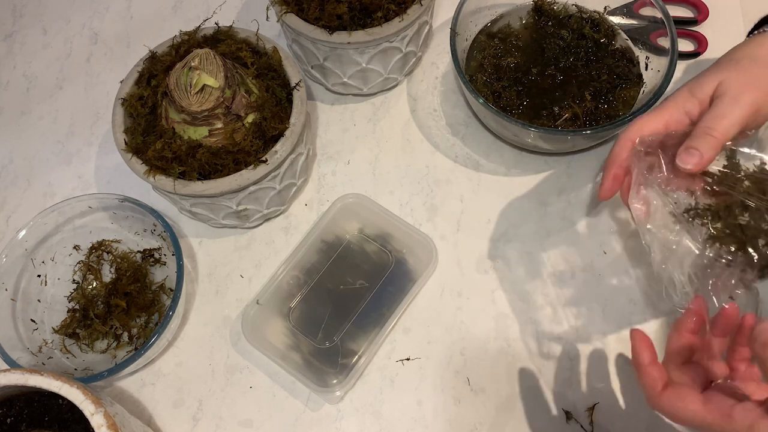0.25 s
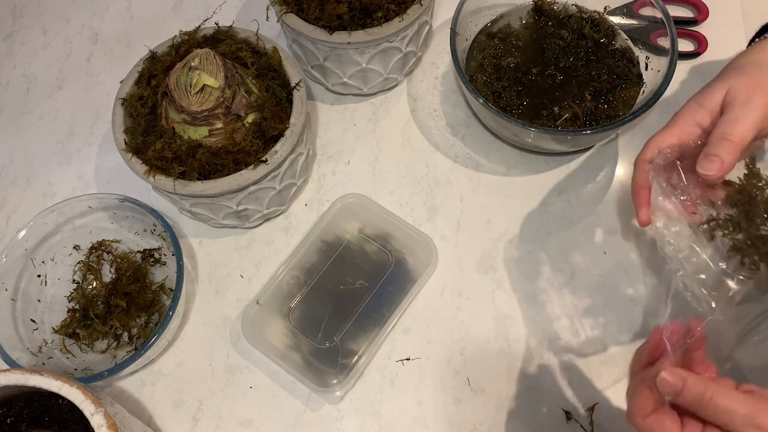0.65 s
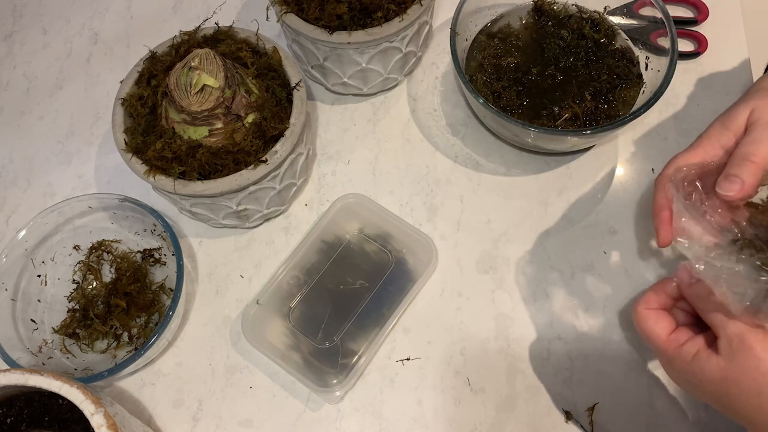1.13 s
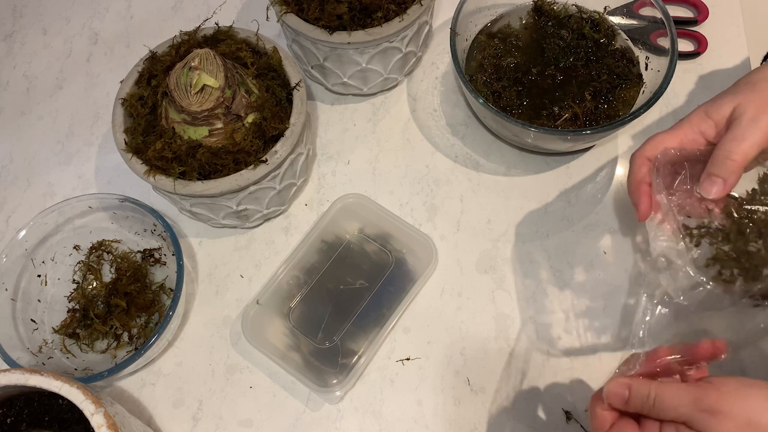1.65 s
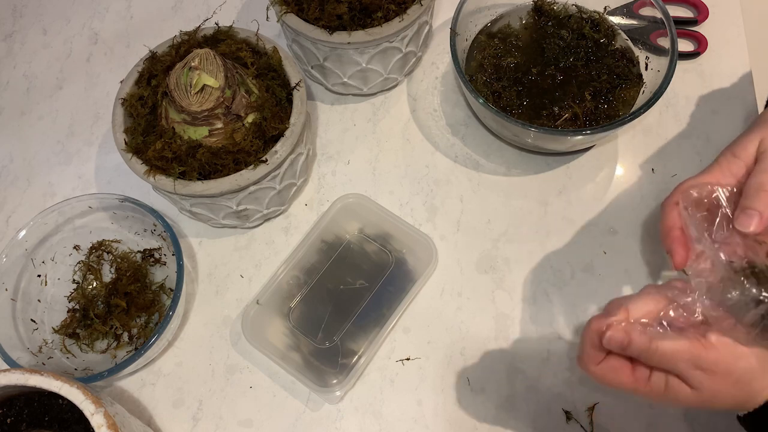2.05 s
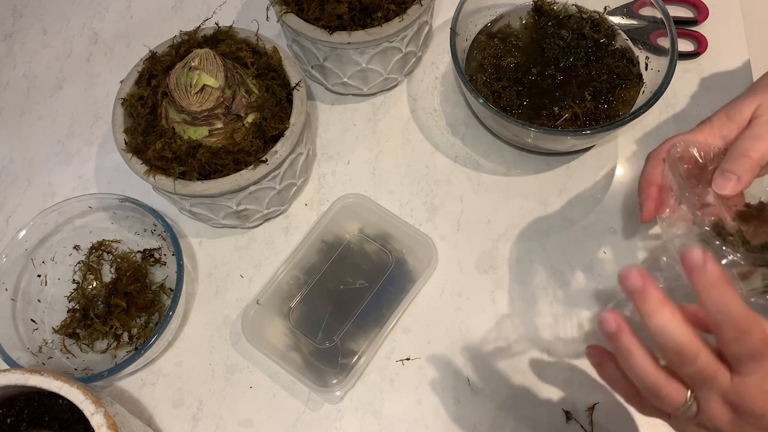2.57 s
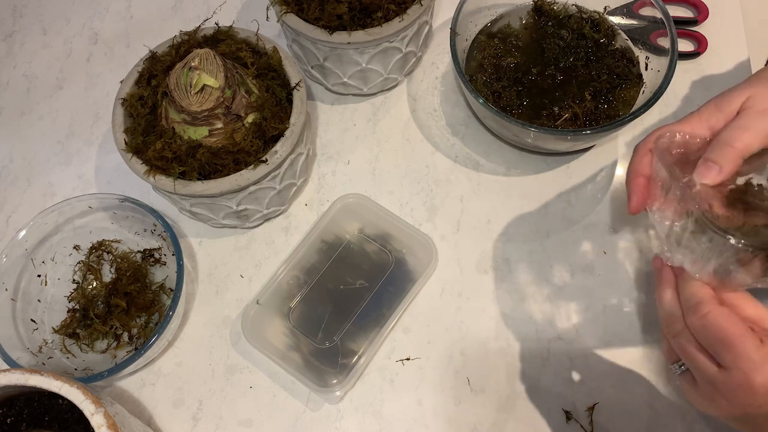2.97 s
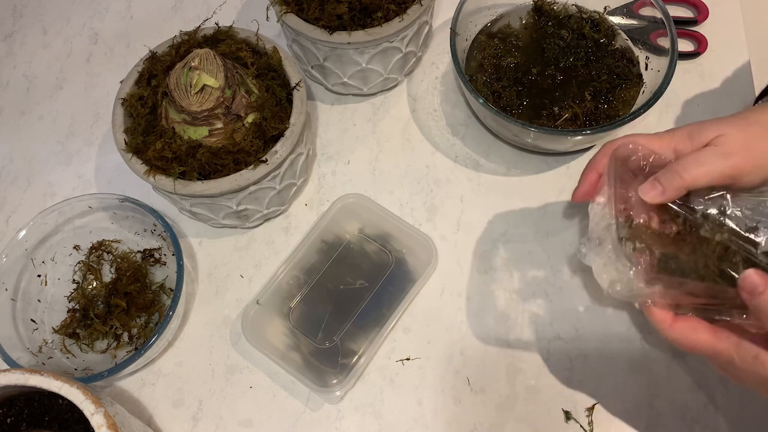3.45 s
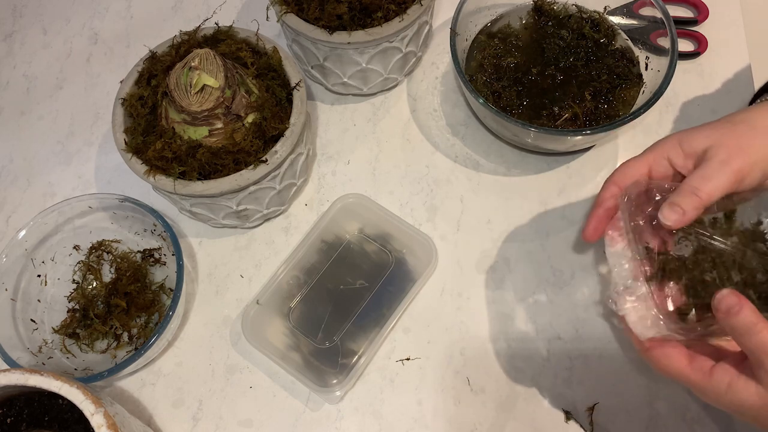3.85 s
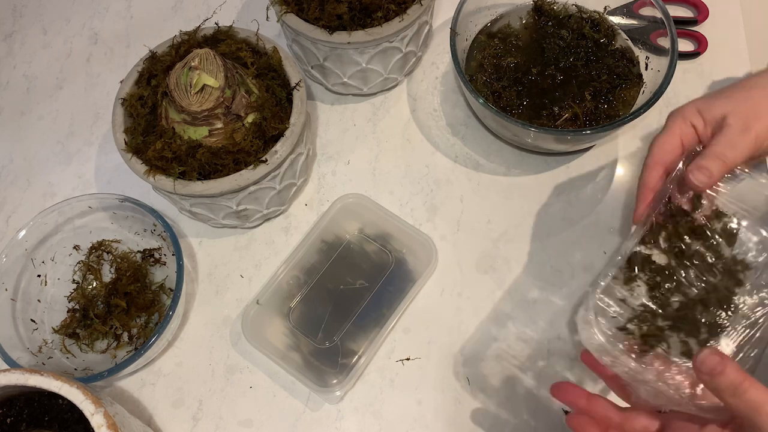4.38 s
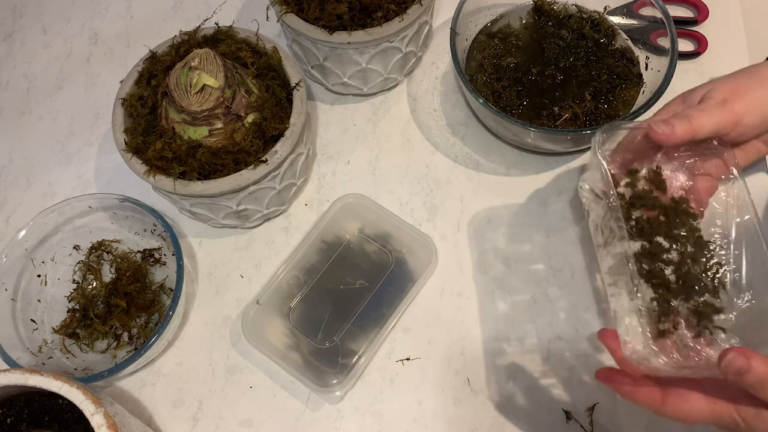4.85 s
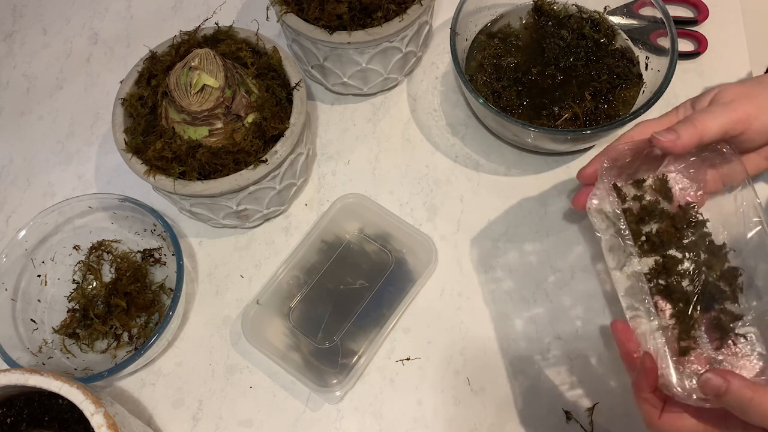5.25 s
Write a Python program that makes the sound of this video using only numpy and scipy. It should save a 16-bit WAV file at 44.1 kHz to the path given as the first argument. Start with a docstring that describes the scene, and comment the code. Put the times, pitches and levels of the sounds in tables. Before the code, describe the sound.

Cling film is pulled tight around a thin plastic tub, heard close in a small, hard-walled kitchen. A single sharp, pitched snap comes right at the start as the tub wall buckles. From about 0.4 to 1.7 seconds, short pulls make the film crinkle in swarms of tiny bright clicks, with a few separate ticks and a soft hollow bump. Around 2 seconds a quick cluster of snaps follows, then more rustling and light fingertip bumps until about 3.4 seconds. A loud crack at 3.5 seconds opens the busiest part: strong snaps of differing pitch crowd in around 4.3 seconds, at 4.8, and from 5.2 to 5.4, while the duller rubbing of fingers on film grows. Each snap has a short, bright echo, with nearby bowls ringing very faintly. A quiet, low room hum with slight hiss lies underneath throughout.

```python
"""Hands pull cling film tight round a thin plastic tub on a kitchen worktop.
First comes one sharp, pitched snap as the tub wall buckles; then short pulls make the film rustle
in swarms of tiny crease clicks. Near 2 s come a few more snaps, then more rustle and fingertip bumps.
From about 3.5 s the loudest snaps crowd in and the rubbing grows. All along, a near wall throws
each snap back, and the small hard room and its bowls ring on over a low murmur."""
import sys
import numpy as np
from scipy import signal
from scipy.fft import rfft, irfft, next_fast_len
from scipy.io import wavfile

SR = 44100
rng = np.random.default_rng(int(sys.argv[2]) if len(sys.argv) > 2 else 0)


def put_to_file(sound):
    """Save the sound as 16-bit audio at rate SR, in the file named by the first command-line argument."""
    columns = np.atleast_2d(sound).T  # one column per channel
    safe = np.clip(columns, -1, 1)
    whole_steps = np.round(safe * 32767)
    wavfile.write(sys.argv[1], SR, whole_steps.astype(np.int16))


N = 243431

# Levels in the tables are relative. A "tone" is a pitch at which the plastic rings.
# The tub wall buckles under the tight film, a different patch each time:
# time_s, crack_db, treble_edge_hz, main_tone_db, main_tone_hz, second_tone_hz, third_tone_hz
WALL_SNAPS = [(0.1105, -9, 15000, 2.5, 1380, 5500, 2750), (1.8946, -2.5, 4800, 11.5, 648, 1440, 500),
              (2.088, -3, 6100, 3, 930, 2280, 4320), (2.1388, 2.5, 2100, 16, 764, 1700, 2900),
              (2.15, -3.5, 2460, 11.5, 1290, 650, 290), (3.4869, 9.5, 6900, 22.5, 3330, 2060, 730),
              (3.9217, -3, 9500, 7.5, 1700, 1160, 3440), (4.2418, 5, 3500, 11.5, 2530, 1450, 322),
              (4.254, 5, 2600, 16.5, 730, 1480, 313), (4.3446, 9.5, 7400, 17, 725, 3960, 2100),
              (4.3804, 0, 16000, 16.5, 1420, 1170, 8100), (4.5731, -2, 4100, 10, 1350, 2420, 680),
              (4.847, 9.5, 8140, 28, 1123, 3240, 530), (5.17, 6, 8100, 17.5, 2620, 503, 1740),
              (5.2148, 3, 16000, 13.5, 5300, 3800, 396), (5.3525, -4.5, 9200, 5, 1010, 2270, 5100),
              (5.379, 6, 14400, 14, 850, 5570, 3570)]
LEAD_S = .003  # room ahead of each crack, so that its start is not cut off
# A single fold of film flips with a bright tick: time_s, crack_db, pitch_hz
FOLD_TICKS = [(0.072, -18.5, 1020), (0.6235, -22.5, 4150), (0.7404, -22, 780), (0.8644, -19.5, 6030),
              (0.9943, -8, 4400), (1.014, -14, 1970), (1.353, -11, 885), (1.457, -17, 2410),
              (2.3084, -19, 1420), (2.354, -24, 10940), (2.641, -31.5, 2520), (2.8638, -9, 8700),
              (3.1606, -23.5, 1110), (3.723, -12, 2720), (3.749, -12, 1080), (3.863, -13.5, 2550),
              (4.312, -14.5, 740)]
# A fingertip bumps the tub, ringing its hollow and its wall: time_s, hollow_db, wall_db
FINGER_BUMPS = [(0.625, -2.5, -18), (2.959, -5, -7.5), (3.2275, -21, 1.5), (3.724, -11, 0),
                (3.432, -18, -15), (4.227, -11, -11)]
# A hand pulls or smooths the film: start_s, length_s, crinkle_db, rub_db
FILM_PULLS = [(0.39, 0.047, -55.5, -61), (0.432, 0.06, -51, -67), (0.554, 0.04, -56.5, -60),
              (0.715, 0.12, -61, -58), (0.831, 0.089, -48.5, -56.5), (0.945, 0.12, -46.5, -48.5),
              (1.329, 0.06, -47.5, -47.5), (1.409, 0.047, -46, -51), (1.502, 0.1, -54, -56.5),
              (1.647, 0.055, -53, -55.5), (2.033, 0.042, -57, -55), (2.285, 0.15, -60.5, -56.5),
              (2.631, 0.02, -50.5, -54.5), (2.676, 0.11, -54.5, -66), (2.801, 0.09, -46.5, -62),
              (2.91, 0.04, -55, -61), (3.153, 0.03, -57, -55.5), (3.32, 0.03, -56.5, -61),
              (4.258, 0.11, -55, -48), (4.643, 0.031, -58, -51), (5.136, 0.37, -60, -50.5)]
# Between pulls the film stirs in the grip, more once the tub is turned over: time_s, crinkle_db, rub_db
GRIP_STIR = [(0, -63, -61.5), (0.4, -62, -63.5), (0.69, -68, -68), (1.18, -62, -64), (1.28, -68, -68),
             (2.35, -58.5, -59), (2.6, -79, -87), (3.049, -63.5, -64.5), (3.8, -60, -49),
             (4.199, -60, -55.5), (5.1, -60.5, -51.5), (5.5, -63, -51)]
# The bright crinkle of small creases: frequency_hz, gain_db
CRINKLE_COLOUR = [(600, -38), (1800, -12), (3500, -4), (6000, 0.5), (9000, 1.5), (13000, 5), (16000, -1)]
# The duller rub of fingers and broad folds: frequency_hz, gain_db
RUB_COLOUR = [(100, 3.5), (280, 2), (500, 1.5), (900, -2), (1500, 2), (2800, -4.5), (5000, -3),
              (12000, -44)]
# First echoes from nearby surfaces: delay_s, gain_db
EARLY_ECHOES = [(.0056, -4), (0.0134, -7), (0.0235, -8)]
# How long the room takes to fade by 60 dB: frequency_hz, fade_s
ROOM_FADE = [(200, 0.24), (600, 0.44), (1150, 0.48), (2300, 0.4762), (3400, 0.44), (5000, 0.4337),
             (9000, 0.2963), (15000, 0.3859)]
# How strongly the room rings, from bass to treble: frequency_hz, gain_db
ROOM_TONE = [(150, 4), (310, 7), (410, 4), (600, 3.5), (1200, 1), (2400, 1), (3500, 1.5), (7000, 3.5),
             (11000, 0.5), (16000, -8)]
# How wide the room sounds (more side signal is wider): frequency_hz, side_gain_db
STEREO_WIDTH = [(100, -20.5), (350, -16), (700, -8.5), (1400, -6), (4400, -9), (8500, -6.5), (15000, -15)]
# Bowls and pots on the worktop ring along faintly: pitch_hz, level_db, fade_s
BOWL_TONES = [(309.3, 5, 0.69), (787, 7, 0.091), (994, 13.5, 0.58), (1110, 5, 1), (1320, -13, 0.57),
              (1477, 9.5, 0.18), (1930, -22, 0.54), (3240, 9, 0.45)]
# The room's steady murmur and hiss: frequency_hz, gain_db
MURMUR_COLOUR = [(15, -19), (35, -20), (60, -5.5), (130, -3.5), (190, -3.5), (300, 0.5), (450, -6),
                 (700, -8.5), (1500, -12), (4000, -17), (9000, -21.5), (16000, -34)]


def snap(patch, lags, ring_db, crack_s=0.000758, q=3.38, low_hz=540, air_hz=15000):
    """A patch of plastic flips over: a very short crack and a few cycles of its own tones."""
    crack_db, edge_hz, *tones = patch
    f = np.fft.rfftfreq(4096, 1 / SR) + 1
    bass_cut = 1 - 1 / (1 + (f / low_hz) ** 4)  # a small patch gives off little bass
    power = amp(crack_db - 1) ** 2 / (1 + (f / edge_hz) ** 5) * bass_cut
    for hz, db in tones:
        ratio = (f / hz) ** 2
        power += (amp(db + ring_db) * ratio / (ratio + (q * (1 - ratio)) ** 2)) ** 2
    power = power / (1 + (f / air_hz) ** 12) + 1e-6
    # bending waves travel at different speeds, so each band arrives at its own moment
    delay_s = LEAD_S + crack_s * np.interp(f, np.linspace(0, SR / 2, len(lags)), lags)
    smear = np.exp(-2j * np.pi * np.cumsum(delay_s) * (f[1] - f[0]))
    sound = irfft(ring_out(power) * smear)[:len(f)]
    return sound * signal.windows.tukey(len(f), .08)


def patches(hollow_hz=330, wall_hz=730):
    """Lists snaps, ticks and bumps as time_s, crack_db, treble_edge_hz, then (pitch_hz, level_db) tones."""
    walls = [(s, db, edge_hz, (main_hz, main_db), (second_hz, db + 7), (third_hz, db + 3.5))
             for s, db, edge_hz, main_db, main_hz, second_hz, third_hz in WALL_SNAPS]
    folds = [(s, db, 10000, (hz, db + 8.5), (hollow_hz, db + 1)) for s, db, hz in FOLD_TICKS]
    bumps = [(s, -26, 2100, (hollow_hz, hollow_db), (wall_hz, wall_db))
             for s, hollow_db, wall_db in FINGER_BUMPS]
    return walls + folds + bumps


def snaps(lags, ring_db):
    """Every snap, tick and bump at its time; ring_db turns their tones up or down."""
    out = np.zeros(N)
    for (time_s, *patch), patch_lags in zip(patches(), lags):
        add(out, time_s - LEAD_S, snap(patch, patch_lags, ring_db))
    return out


def rustle():
    """Fine creases fizz, larger ones tick and broad folds rub, as hard as the hands work the film."""
    crinkling, rubbing = handling()
    fine = creases(per_s=7900, spread_db=2.5, low_hz=1780, high_hz=15000, q=0.83)
    ticks = creases(per_s=120, spread_db=5, low_hz=1510, high_hz=9050, q=1.4)
    broad = creases(per_s=3000, spread_db=0, low_hz=252, high_hz=5100, q=2.1)
    crinkle = amp(-4.5) * unit(colour(fine, CRINKLE_COLOUR)) + amp(-11) * unit(ticks)
    rub = amp(-7) * unit(colour(broad, RUB_COLOUR))
    return crinkle * crinkling + rub * rubbing


def creases(per_s, spread_db, low_hz, high_hz, q, count=14):
    """A swarm of tiny clicks; each rings a crease of its own pitch, longer when q is high."""
    size = amp(spread_db * np.minimum(rng.exponential(1, N), 4.5)) * rng.choice([-1, 1], N)
    clicks = size * (rng.random(N) < per_s / SR)
    crease = rng.integers(0, count, N)
    out = np.zeros(N)
    for k, hz in enumerate(np.geomspace(low_hz, high_hz, count)):
        out += signal.lfilter(*signal.iirpeak(hz, max(q, 1), fs=SR), clicks * (crease == k))
    return out


def handling(swell_s=0.023, fade_db_per_s=262):
    """Loudness of crinkle and rub: each pull swells, holds and fades above the stirring in the grip."""
    t = np.arange(N) / SR
    times_s, *grip_db = np.transpose(GRIP_STIR)
    power = amp([np.interp(t, times_s, db) for db in grip_db]) ** 2
    for start_s, length_s, crinkle_db, rub_db in FILM_PULLS:
        swell = np.clip((t - start_s) / swell_s, 0, 1)
        fade = amp(-fade_db_per_s * np.clip(t - start_s - length_s, 0, 1))
        power += (amp([[crinkle_db], [rub_db]]) * swell * fade) ** 2
    return np.sqrt(power)


def kitchen(forward, around, rustling):
    """Sound arrives directly, then as early echoes, then as the ring of room and bowls."""
    bounced = signal.lfilter(*signal.butter(1, 4500, fs=SR), moving(forward, scatter))
    near = amp(-1) * forward + amp(-4) * bounced
    # a snap comes from one spot and throws mostly treble at the wall
    treble = signal.lfilter(*signal.butter(1, 1200, "high", fs=SR), around)
    for delay_s, db in EARLY_ECHOES:
        add(near, delay_s, amp(db) * treble)
    # creases lie all over the film, so their echoes merge into the swarm
    near += amp(3.3) * rustling
    into_room = amp(-0.61) * colour(around + rustling, ROOM_TONE)
    mid = near + moving(into_room, room_tail) + bowls(around + rustling)
    side = moving(into_room, room_tail)
    return stereo(mid, side) * amp([[-0.2], [0.2]])  # a little to the right


def moving(x, make_echoes, step_s=.17, count=4):
    """The tub keeps moving, so the sound fades from one set of echoes to the next."""
    place = np.arange(N) / SR / step_s
    out = np.zeros(N)
    for k in range(count):
        distance = abs((place - k + count / 2) % count - count / 2)
        share = np.cos(np.pi / 2 * np.minimum(distance, 1))
        out += signal.oaconvolve(x * share, make_echoes())[:N]
    return out


def scatter(decay_s=0.0044, build_s=0.0011):
    """A few milliseconds of bounces between tub, hands and worktop."""
    t = np.arange(SR // 50) / SR
    echoes = rng.standard_normal(len(t)) * np.exp(-t / decay_s) * np.minimum(t / build_s, 1) ** 2
    return echoes / np.linalg.norm(echoes)


def room_tail(build_s=0.0029):
    """Dense room echoes build up quickly, then each band fades at its own pace."""
    t = np.arange(SR // 2) / SR
    echoes = rng.choice([-1, 1], len(t)) * (rng.random(len(t)) < .25) * (1 - np.exp(-t / build_s))
    hz, age_s, bands = signal.stft(echoes, SR, nperseg=256)
    fade = amp(-60 * age_s / look_up(ROOM_FADE, hz)[:, None])
    out = signal.istft(bands * fade, SR, nperseg=256)[1]
    return out / np.linalg.norm(out)


def bowls(x):
    """Bowls and pots pick up the sound and ring at their own pitches."""
    f = np.fft.rfftfreq(SR, 1 / SR) + 1e-3
    ring = 0
    for hz, db, fade_s in BOWL_TONES:
        q = np.pi * hz * fade_s / np.log(1000)
        ring += amp(db) / (1 + 1j * q * (f / hz - hz / f))
    return amp(-3) * signal.fftconvolve(x, irfft(ring))[:N]


def background():
    """Steady low murmur of the room with faint hiss."""
    mid, side = (unit(colour(noise, MURMUR_COLOUR)) for noise in rng.standard_normal((2, N)))
    return amp(-58.5) * stereo(mid, side)


def stereo(mid, side):
    """Left and right share the mid signal and get the side signal with opposite signs."""
    side = colour(side, STEREO_WIDTH)
    return np.array([mid + side, mid - side])


def ring_out(power):
    """Turns power per frequency into the spectrum of a sound that starts at once and dies away."""
    cepstrum = irfft(.5 * np.log(power))
    lag = np.arange(len(cepstrum))
    one_sided = np.where(lag == 0, 1., 2. * (lag < len(lag) // 2))
    return np.exp(rfft(cepstrum * one_sided))


def amp(db):
    """Turns decibels into a gain."""
    return 10 ** (np.asarray(db) / 20)


def unit(x):
    """Scales x to an average (rms) level of 1."""
    return x / np.sqrt(np.mean(x ** 2) + 1e-20)


def look_up(table, hz):
    """Reads between the rows of a table, on a log-frequency axis."""
    f, value = np.transpose(table)
    return np.interp(np.log(hz + 1), np.log(f + 1), value)


def colour(x, table):
    """Shapes the bass and treble of x by a table of frequency_hz, gain_db."""
    size = next_fast_len(N)
    gain = amp(look_up(table, np.fft.rfftfreq(size, 1 / SR)))
    return irfft(rfft(x, size) * gain, size)[:N]


def add(mix, start_s, sound):
    """Adds a sound into the mix at start_s."""
    part = mix[max(0, round(start_s * SR)):][:len(sound)]
    part += sound[:len(part)]


def scene():
    """Film and tub in the kitchen; a patch sends its tones mostly forward and its crack all around."""
    lags = rng.exponential(size=(len(patches()), 24))  # how late each of 24 bands arrives
    forward = snaps(lags, ring_db=1.6)
    around = snaps(lags, ring_db=-4)
    return kitchen(forward, around, rustle()) + background()


def record(dry):
    """Rounds off the loudest peaks, then cuts the treble above 15950 Hz."""
    low_pass = signal.firwin(301, 15950, window=("kaiser", 9), fs=SR)
    return signal.oaconvolve(np.tanh(dry), low_pass[None], "same")


dry = scene()
out = record(dry)
put_to_file(out)
```